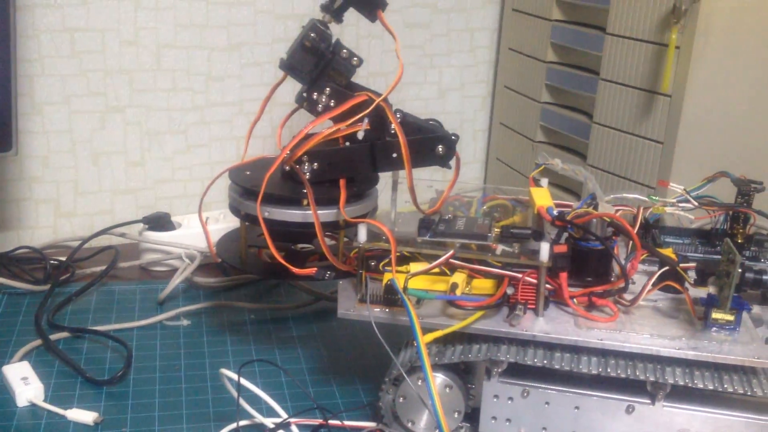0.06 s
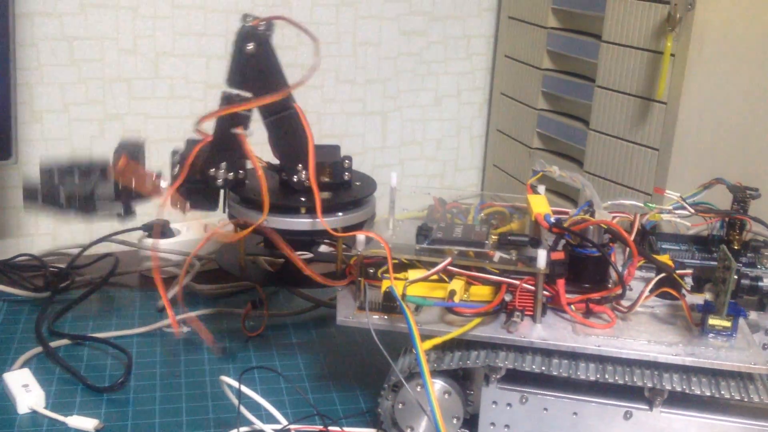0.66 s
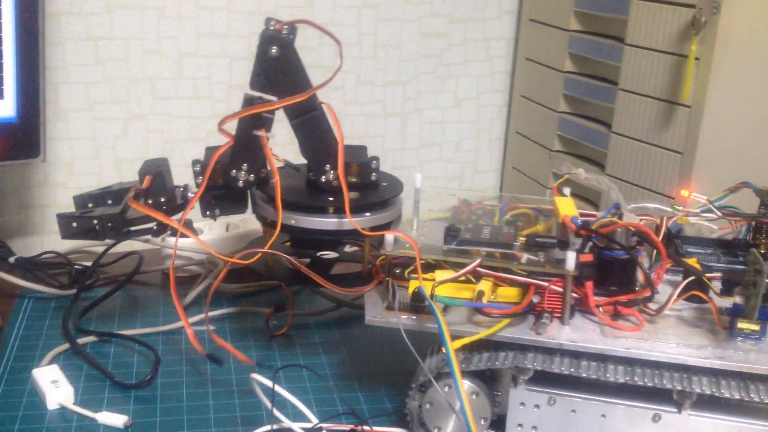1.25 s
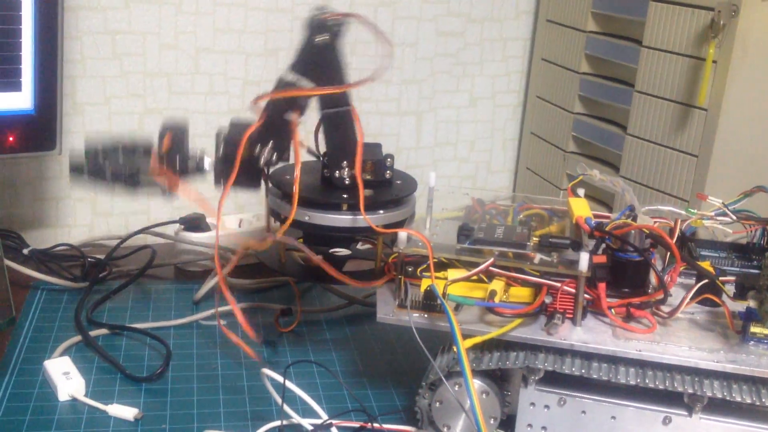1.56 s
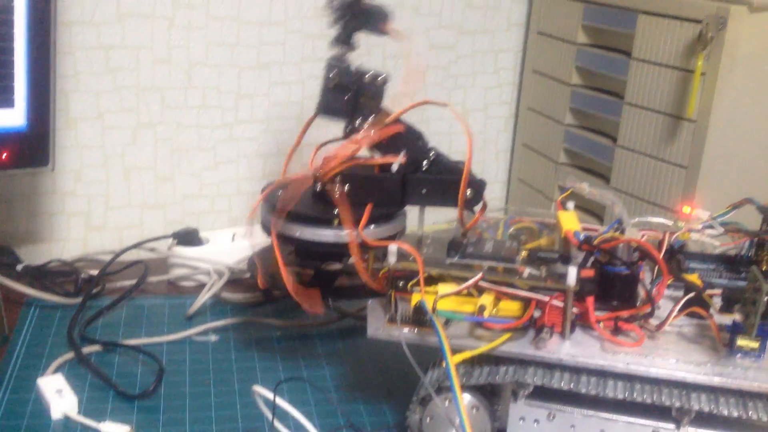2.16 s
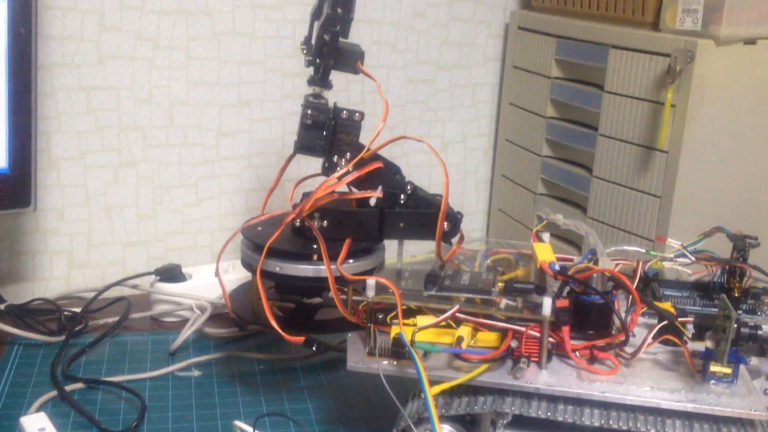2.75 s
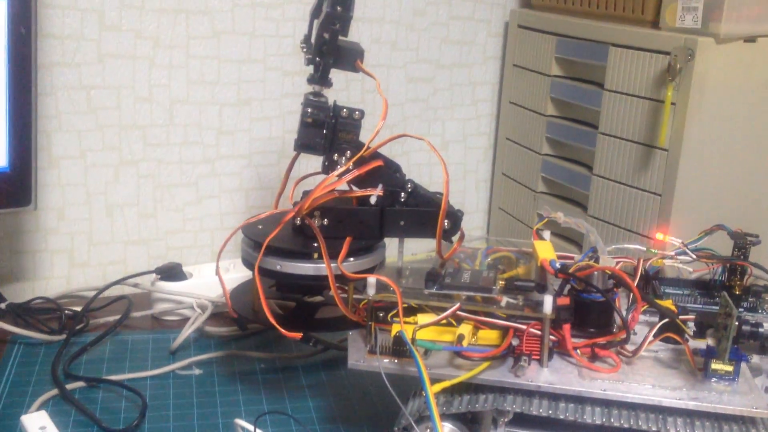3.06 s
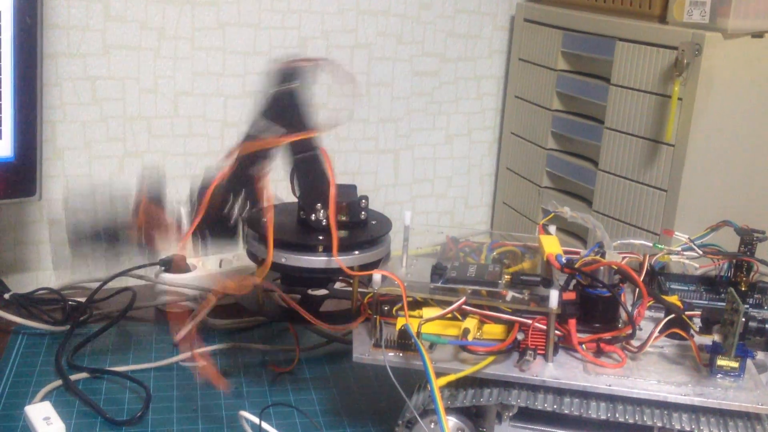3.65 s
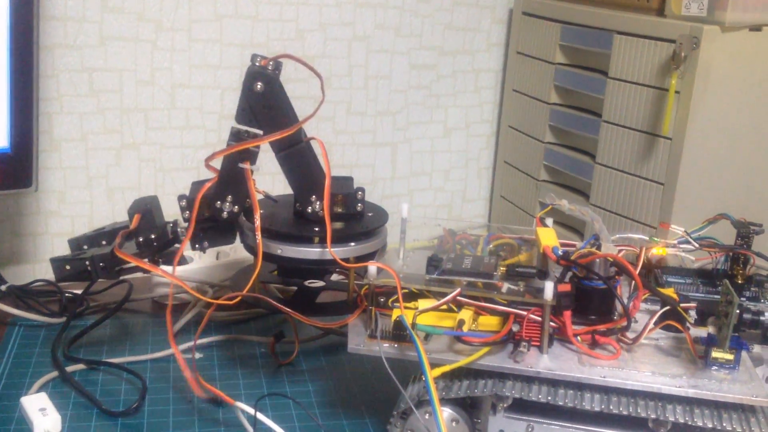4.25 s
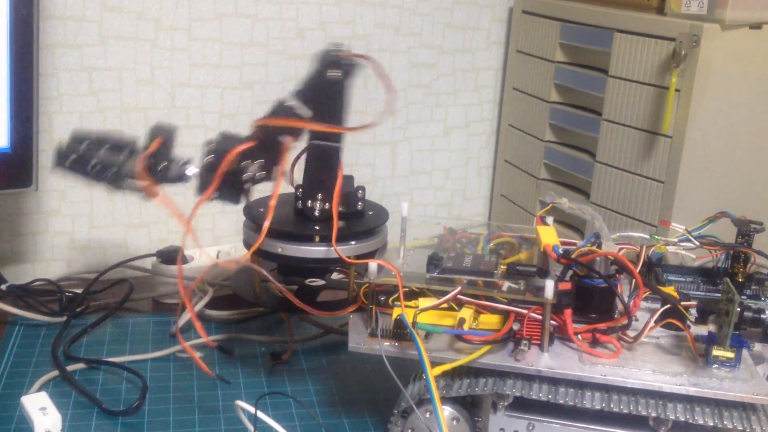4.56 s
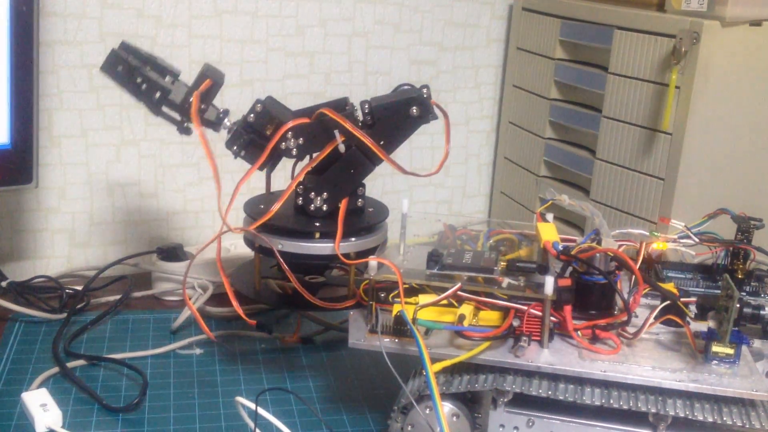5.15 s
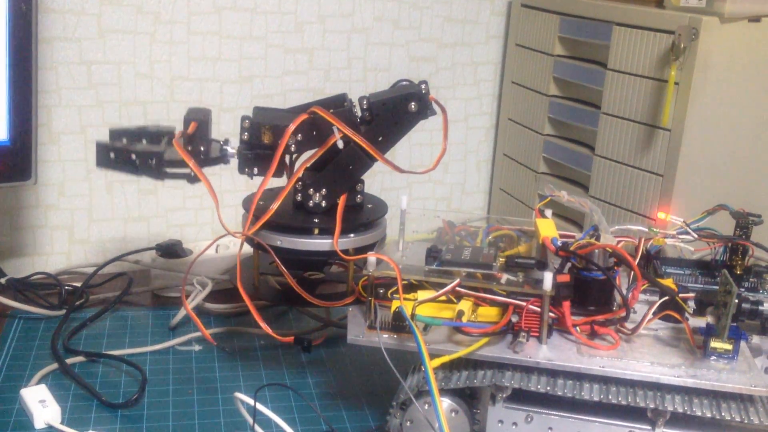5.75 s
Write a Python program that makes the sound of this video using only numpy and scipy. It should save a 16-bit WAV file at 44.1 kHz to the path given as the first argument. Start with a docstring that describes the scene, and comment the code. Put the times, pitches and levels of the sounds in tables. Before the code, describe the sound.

In a small, quiet room, a metal robot arm swings four times, each swing a short burst of whining, rattling servo gears with little gliding tones. The first and third swings end in sharp joint clacks and thumps on the workbench. Between moves there are faint ticks and a motor buzzing under load. Finally the arm creeps down with a thin, pulsing sizzle. The microphone sounds small and close, with little bass.

```python
"""In a small, quiet room, a metal robot arm on a workbench swings four times, then creeps slowly down.
Its geared servos whine at harmonics of the tooth-meshing rate, and colliding teeth excite the
resonances of the brackets as a rattle. Under load a motor sizzles, its brush noise pulsed by
commutation. When the arm lands, its joints clack and the impact rings the modes of the bench."""
import sys
import numpy as np
from scipy import signal
from scipy.fft import rfft, irfft
from scipy.io import wavfile
from scipy.ndimage import uniform_filter1d

SR = 44100
rng = np.random.default_rng(int(sys.argv[2]) if len(sys.argv) > 2 else 0)


def int16_out(signal):
    """Quantize to a 16-bit WAV file."""
    q = np.round(np.clip(np.atleast_2d(signal).T, -1, 1) * 32767)
    wavfile.write(sys.argv[1], SR, q.astype(np.int16))


N = 264600
TIME = np.arange(N) / SR
FREQS = np.maximum(np.arange(N // 2 + 1) * SR / N, 1)

# commutation rate of the loaded motor: (time [s], frequency [Hz])
COMMUTATION = [(.64, 460), (.9, 430), (1.12, 425), (1.25, 360), (4.92, 330), (5.15, 335), (5.22, 364),
               (5.41, 368), (5.46, 402), (5.6, 426), (5.68, 424), (5.765, 440), (6, 388)]
# landings and joints taking up slack: (time [s], clack [dB], thump [dB], thump tilt [dB/octave])
KNOCKS = [(0.5783, -27.5, -41, -0.5), (.643, -28.5, -34, 0), (0.696, -53, -53, -5), (0.869, -48, -52, -10),
          (.935, -51, -78, 11), (1.975, -48, -64.5, 13.5), (2.102, -52, -53, 7), (2.198, -60, -66.5, 8.5),
          (3.6208, -30.5, -38, 2), (3.677, -30.5, -35.5, 3), (3.7525, -23.5, -37.5, -3),
          (3.76, -26, -39, 6), (3.8266, -26.5, -28.5, -5.5), (3.8306, -27, -38.5, 4.5),
          (3.892, -39.5, -71, 12), (4.017, -71, -56, 8), (4.3137, -66, -73, 8.5), (5.974, -59.5, -57, 1.5)]
# spectrum of tooth impacts: (frequency [Hz], level [dB])
GEAR_SPECTRUM = [(80, -62), (300, -31), (520, -21), (600, -24.5), (680, -6), (900, -1), (1350, -3.5),
                 (1900, 2.5), (3000, 3), (5000, -4.5), (6500, -5.5), (8500, -10), (11000, -11),
                 (13500, -16), (15500, -23)]
# the four swings: (start [s], braking time [s], rocking of the base [dB])
SWINGS = [(0.133, 0.742, -73), (1.466, 2.118, -62), (3.204, 3.844, -66), (4.35, 4.822, -55)]
# effort of the gear train, one table a swing: (time [s], level [dB])
EFFORT = [
    [(.16, -36), (.21, -41), (.28, -36.5), (.395, -44.5), (.5, -33.5), (.61, -36), (.68, -42), (.76, -34.5)],
    [(1.55, -39), (1.65, -38.5), (1.72, -39.5), (1.83, -38), (1.86, -43), (1.96, -37.5), (2.04, -43.5),
     (2.09, -42), (2.12, -39)],
    [(3.31, -42), (3.38, -38.5), (3.44, -45), (3.53, -43), (3.6, -34.5), (3.65, -39.5), (3.78, -35.5),
     (3.84, -39.5)],
    [(4.37, -41.5), (4.43, -38), (4.47, -44), (4.5, -40), (4.62, -41), (4.69, -36), (4.77, -41),
     (4.82, -38.5)],
]
# shoulder gears, one table a swing: (time [s], mesh frequency [Hz], whine re effort [dB])
SHOULDER = [
    [(.15, 1620, -3), (.27, 1425, -5.5), (.404, 2128, -10), (.486, 2175, -2.5), (.518, 2369, -3.5),
     (.584, 2373, -16), (.61, 2061, -5.5), (.744, 2800, -16), (.8, 2370, -18)],
    [(1.5, 1548, -16), (1.64, 1559, -1), (1.7, 1584, -6.5), (1.764, 1656, -5.5), (1.825, 1473, -1),
     (1.885, 1792, 1), (1.97, 1825, -3.5), (2.05, 1512, -19), (2.114, 1896, -1)],
    [(3.26, 1617, -9), (3.315, 1547, -1), (3.36, 1500, -11), (3.53, 1601, -11), (3.562, 2176, -3),
     (3.602, 2367, -3), (3.636, 2348, -6.5), (3.716, 1754, -2.5), (3.82, 1979, -4)],
    [(4.39, 1524, -21), (4.434, 1687, -15), (4.496, 1494, -15), (4.6, 1578, -11.5), (4.68, 1643, -2.5),
     (4.728, 1392, -24), (4.8, 1527, -2.5), (4.85, 1478, -5)],
]


def from_db(db):
    """Amplitude ratio of a level in decibels."""
    return 10 ** (np.asarray(db) / 20)


def rms_one(x):
    """Normalisation to unit rms."""
    return x / np.sqrt(np.mean(x ** 2) + 1e-20)


def curve(tables, column):
    """Linear interpolation in time through one column of a list of tables."""
    rows = np.vstack(tables)
    return np.interp(TIME, rows[:, 0], rows[:, column])


def colour(points):
    """Spectral envelope: gain from levels interpolated over log frequency."""
    hz, db = np.transpose(points)
    return from_db(np.interp(np.log(FREQS), np.log(hz), db))


def resonances(peaks, floor_db):
    """Gain of Lorentzian resonances, added in power to a flat floor."""
    power = sum(from_db(db) ** 2 / (1 + (2 * (FREQS - hz) / width) ** 2) for hz, width, db in peaks)
    return np.sqrt(power + from_db(floor_db) ** 2)


def shaped(x, gain):
    """Filtering as multiplication of the spectrum; unit rms."""
    return rms_one(irfft(rfft(x) * gain, N))


def noise(gain):
    """Gaussian noise under a spectral envelope; unit rms."""
    return shaped(rng.standard_normal(N), gain)


def low_cut(x, hz, order):
    """Butterworth high-pass filtering."""
    return signal.sosfilt(signal.butter(order, hz, "high", fs=SR, output="sos"), x)


def drift(rate_hz):
    """Random fluctuation: low-pass noise of unit rms."""
    return noise(1 / (1 + (FREQS / rate_hz) ** 2))


def rotation(hz, jitter, rate_hz):
    """Phase in radians, the integral of a slightly unsteady frequency."""
    return 2 * np.pi * np.cumsum(hz * (1 + jitter * drift(rate_hz))) / SR


def impacts(per_s, spread_db):
    """Shot noise: impulses at random times, their levels spread by spread_db; unit rms."""
    sizes = from_db(spread_db * np.minimum(rng.exponential(1, N), 4))
    return rms_one(sizes * rng.choice([-1, 1], N) * (rng.random(N) < per_s / SR))


def impulses(times, db):
    """Ideal blows: one impulse at each time."""
    clicks = np.zeros(N)
    clicks[np.round(times * SR).astype(int)] = from_db(db)
    return clicks


def decay(clicks, t60):
    """Damping: an envelope that jumps at each impulse and falls exponentially."""
    return signal.lfilter([1], [1, -from_db(-60 / (t60 * SR))], clicks + 1e-18)


def arch(start, length):
    """Half-sine envelope."""
    return np.sin(np.pi * np.clip((TIME - start) / length, 0, 1)) * (TIME < start + length)


def swinging(jerk=0.064, run_up_s=0.083, brake_db_per_s=439):
    """Envelope of the swings: a jerk, a power-law run-up, full motion, then exponential braking."""
    gain = 0
    for start, braking, _ in SWINGS:
        run_up = np.clip((TIME - start) / run_up_s, 0, 1) ** 1.57
        brake = from_db(-brake_db_per_s * np.maximum(TIME - braking, 0))
        gain = gain + (TIME >= start) * (jerk + (1 - jerk) * run_up) * brake
    return gain


def pushing():
    """Envelopes of rattle and of sizzle as a servo applies brief torque to reach or hold its angle."""
    # servo pushes: (centre time [s], duration [s], gear rattle [dB], motor sizzle [dB])
    pushes = [(0.728, 0.21, -71, -33.5), (0.833, 0.11, -44.5, -75), (0.898, 0.1, -46.5, -48.5),
              (1.011, 0.17, -55, -57.5), (1.087, 0.16, -56.5, -48.5), (1.19, 0.11, -63, -70),
              (2.121, 0.049, -44, -38.5), (2.205, 0.073, -57, -76), (2.274, 0.15, -52.5, -77),
              (2.38, 0.05, -67.5, -74), (3.271, 0.033, -54, -64), (3.963, 0.14, -49.5, -78),
              (4.954, 0.052, -63.5, -66)]
    rattle = sizzle = 0
    for centre, length, rattle_db, sizzle_db in pushes:
        swell = arch(centre - length / 2, length) ** 1.7
        rattle = rattle + from_db(rattle_db) * swell
        sizzle = sizzle + from_db(sizzle_db) * swell
    return rattle, sizzle


def strain(start_s=4.99, stop_s=6.01, fade_s=0.12, db_per_octave=14.5, hunt_hz=6.92):
    """Envelope of the loaded motor: pushes, then a creep, louder with speed, surging as the servo hunts."""
    _, pushes = pushing()
    creeping = np.clip(np.minimum(TIME - start_s, stop_s - TIME) / fade_s, 0, 1)
    octaves = np.log2(curve([COMMUTATION], column=1) / 400)
    hunting_db = 2 * np.cos(2 * np.pi * hunt_hz * (TIME - 5.465))
    return pushes + creeping * from_db(-54.5 + db_per_octave * octaves + hunting_db)


def background():
    """The room's noise floor: faint, stationary broadband noise."""
    # ambient spectrum: (frequency [Hz], level [dB])
    spectrum = [(25, -17), (60, -21), (90, -25), (130, -17), (200, -5), (300, -10.5), (550, -14.5),
                (1200, -16.5), (2000, -20.5), (4200, -23.5), (10000, -31.5), (12500, -30), (15400, -24)]
    return from_db(-66.5) * noise(colour(spectrum))


def reverberation(x, t60, wet_db):
    """Diffuse reflections follow the direct sound and decay exponentially."""
    t = TIME[:SR // 2]
    tail = rng.standard_normal(len(t)) * from_db(-60 * t / t60) * (t > .003)
    return x + from_db(wet_db) * signal.fftconvolve(x, tail / np.linalg.norm(tail))[:N]


def base_tremble():
    """Structure-borne vibration: rocking mass, gears, knocks and motor shake the base, adding in power."""
    # spectrum of the vibrating base: (frequency [Hz], level [dB])
    spectrum = [(30, -45), (90, -32), (125, -3), (175, 0), (200, -3), (235, 4), (285, -6), (430, -10),
                (600, -17), (900, -50)]
    times, _, thump_db, _ = np.transpose(KNOCKS)
    rocking = sum(from_db(db) * arch(start + 0.068, length=0.21) for start, _, db in SWINGS)
    gears = from_db(curve(EFFORT, column=1) - 27) * swinging()
    aftershake = decay(impulses(times, thump_db - 9), t60=0.41)
    motor = from_db(-22) * strain()
    envelope = np.sqrt(rocking ** 2 + gears ** 2 + aftershake ** 2 + motor ** 2)
    return low_cut(envelope * noise(colour(spectrum)), hz=125, order=4)


def tooth_ticks(body):
    """Impulse excitation: a tooth catches as a servo starts or corrects, and the brackets ring."""
    # teeth catching: (time [s], level [dB])
    catches = [(0.131, -51), (0.159, -47), (1.473, -59), (2.378, -64), (3.21, -50), (3.2536, -50),
               (4.0432, -58), (4.351, -54), (4.9434, -71.5), (5.23, -63)]
    ringing = noise(body * colour(GEAR_SPECTRUM))
    return decay(impulses(*np.transpose(catches)), t60=0.094) * ringing


def knocks(body):
    """Impacts make the joints clack and ring the damped modes of the bench, which radiates little bass."""
    # spectrum of the metal joints: (frequency [Hz], level [dB])
    spectrum = [(180, -32), (300, 0), (599, -18), (876, 1), (1640, -4.5), (1900, -1), (3730, -9.5),
                (3990, -10), (4330, -9.5), (12000, -14), (15400, -19)]
    # modes of the base on the bench: (frequency [Hz], level [dB], decay time t60 [s])
    modes = [(131.7, -9.5, 0.23), (151.6, -1.5, 0.13), (177, -2.5, 0.39), (228.7, -6, 0.22),
             (242.3, 1, 0.27), (315, -12, 0.25), (423.5, -7, 0.11), (538, -19.5, 0.35), (658, -8, 0.082),
             (850, -2.5, 0.037), (1006, -11, 0.1)]
    times, clack_db, thump_db, tilt = np.transpose(KNOCKS)
    clack = decay(impulses(times, clack_db), t60=0.089) * noise(np.sqrt(body) * colour(spectrum))
    thump = np.zeros(N)
    for hz, db, t60 in modes:
        radius, omega = from_db(-60 / (t60 * SR)), 2 * np.pi * hz / SR
        arrival = times + rng.uniform(0, 0.0028, len(times))   # bending waves take unequal paths
        strength_db = thump_db + db + tilt * np.log2(hz / 200) + rng.normal(-1.5, 2, len(times))
        hits = impulses(arrival, strength_db) + 1e-18
        ringing = signal.lfilter([0, np.sin(omega)], [1, -2 * radius * np.cos(omega), radius ** 2], hits)
        thump += rng.choice([-1, 1]) * ringing
    return low_cut(clack + thump, hz=116, order=6)


def straining_motor():
    """Commutation drives the can's resonances with periodic clicks and brush noise, over thin harmonics."""
    # resonances of the motor can: (frequency [Hz], bandwidth [Hz], level [dB])
    can_modes = [(4230, 180, 7), (4700, 33, 6.5), (4800, 140, 12.5), (5440, 88, 8), (6180, 99, -30),
                 (6000, 62, 9.5), (6100, 39, -2.5), (6446, 70, 9.5), (6800, 29, 12.5), (7460, 63, 10),
                 (8170, 140, 6.5)]
    # spectrum of the brush sizzle: (frequency [Hz], level [dB])
    spectrum = [(710, -10), (1200, -39), (1550, -11), (1600, -20), (1760, -10), (2280, -15), (2850, -7.5),
                (3530, -14.5), (4760, -11), (5520, -10), (6700, -2), (10000, -13), (12700, -6.5),
                (14400, -13), (15400, -37)]
    # harmonics of the commutation rate: (order [1], level [dB])
    harmonics = [(2, -7), (3, -14), (4, -12), (5, 1), (6, 0), (7, 1), (8, -4), (9, 2), (10, 2), (11, 1),
                 (12, 2), (14, 2)]
    phase = rotation(curve([COMMUTATION], column=1), jitter=.008, rate_hz=45)
    puffs = rms_one(np.exp(0.2 * (np.cos(phase) - 1)))
    spikes = rms_one(np.exp(300 * (np.cos(phase) - 1)))
    brushes = puffs * impacts(per_s=19000, spread_db=0) + 0.45 * rms_one(np.gradient(spikes))
    can = resonances(can_modes, floor_db=-1) / (1 + (700 / FREQS) ** 4)   # too small to radiate bass
    sizzle = shaped(brushes, colour(spectrum) * can)
    tones = sum(from_db(db + 3 * drift(12) + 3 * drift(70)) * np.sin(k * phase) for k, db in harmonics)
    return strain() * (sizzle + from_db(-15.5) * tones)


def mesh_tone(hz, levels_db):
    """Modulation of tooth-rate harmonics: uneven teeth broaden each, an eccentric pinion adds sidebands."""
    phase = rotation(hz, jitter=.012, rate_hz=80)
    tone = 0
    for order, db in enumerate(levels_db, 1):
        clean = np.sin(order * phase)
        smear = drift(120) * clean + drift(120) * np.cos(order * phase)
        tone = tone + from_db(db) * rms_one(clean + .75 * smear)
    return tone * (1 + .4 * np.cos(phase / 10))   # ten teeth to a turn


def elbow_whine():
    """Mesh frequency follows speed, so the elbow's brief moves sound as gliding tones."""
    # elbow glides: (start [s], duration [s], first frequency [Hz], last frequency [Hz], peak level [dB])
    glides = [(.24, 0.12, 2545, 3420, -49), (.575, 0.084, 4230, 3900, -39), (3.28, 0.077, 2143, 2481, -44),
              (3.34, 0.077, 2656, 3360, -39.5), (3.674, 0.071, 3810, 3387, -40.5),
              (4.405, 0.069, 3250, 3380, -42), (4.47, 0.0661, 3759, 3700, -41),
              (4.55, .08, 3485, 3920, -43.5), (4.68, 0.079, 3674, 4090, -41), (4.707, .08, 2524, 2880, -42)]
    whine = 0
    for moves in (glides[0::2], glides[1::2]):   # successive glides may overlap
        pitch = [[(start, first), (start + length, last)] for start, length, first, last, _ in moves]
        envelope = sum(from_db(db) * arch(start, length) for start, length, _, _, db in moves)
        whine = whine + envelope * mesh_tone(curve(pitch, column=1), levels_db=[0, -8])
    return whine


def shoulder_whine():
    """The mesh tone grows with effort; case resonances lift whichever harmonic glides through them."""
    # mesh harmonics, from the fundamental up: (level [dB])
    harmonics_db = [-6, -4, -6.5, -7.5, -8]
    # resonances of the gear case: (frequency [Hz], bandwidth [Hz], level [dB])
    case_modes = [(1800, 140, 5), (2260, 170, 5.5), (3080, 160, 5.5), (4620, 240, 2)]
    envelope = swinging() * from_db(curve(EFFORT, column=1) + curve(SHOULDER, column=2))
    flickering_db = [db + 2 * drift(14) for db in harmonics_db]
    tone = mesh_tone(curve(SHOULDER, column=1), flickering_db)
    return irfft(rfft(envelope * tone) * resonances(case_modes, floor_db=-4), N)


def worn_pinion(teeth=10, size=256):
    """Periodicity: the same flaws recur on every turn, giving a comb of tones that glides with speed."""
    angle = rotation(curve(SHOULDER, column=1) / teeth, jitter=.006, rate_hz=40.6)
    flaws = rng.standard_normal(size)
    return rms_one(np.interp(angle / (2 * np.pi) * size, np.arange(size), flaws, period=size))


def shifting_contacts(x, depth_db, size=512):
    """Spectral modulation: gear contacts move as the arm turns, so narrow bands swell and fade."""
    cells = signal.stft(x, nperseg=size)[2]
    swell = rng.standard_normal(cells.shape)
    for axis, width in ((0, 3), (0, 3), (1, 8), (1, 6)):   # smooth over frequency, then time
        swell = uniform_filter1d(swell, width, axis=axis)
    return signal.istft(cells * from_db(depth_db * rms_one(swell)), nperseg=size)[1][:N]


def gear_rattle(body, usual_effort_db=-38.5):
    """Backlash: loose teeth collide thousands of times a second, in bunches, and ring the brackets."""
    effort_db, moving = curve(EFFORT, column=1), swinging()
    pushes, _ = pushing()
    teeth = impacts(per_s=8000, spread_db=2.3) + .75 * moving * worn_pinion()
    teeth = shifting_contacts(teeth, depth_db=2.1)
    teeth = teeth * from_db(1.42 * drift(31))
    case = body * colour(GEAR_SPECTRUM)
    above_growl, above_middle = (1 / (1 + (hz / FREQS) ** 12) for hz in (1400, 5200))
    growl = from_db(-10) * shaped(teeth, case * (1 - above_growl))
    middle = from_db(-3) * shaped(teeth, case * (above_growl - above_middle))
    treble = from_db(-4.5) * shaped(teeth, case * above_middle)
    # the growl follows effort only weakly, swells sooner, lasts longer and is weaker in pushes
    growl_db = usual_effort_db + 0.23 * (effort_db - usual_effort_db)
    growl_gain = moving ** 0.47 * from_db(growl_db) + from_db(-3.5) * pushes
    upper_gain = moving * from_db(effort_db) + pushes
    return growl_gain * growl + upper_gain * (middle + treble)


def scene():
    """Superposition: the arm's sources reverberate together over the noise floor."""
    # resonances of gear cases and brackets: (frequency [Hz], bandwidth [Hz], level [dB])
    bracket_modes = [(664, 39, 9.5), (820, 27, 0), (1168, 18, -2.1), (1517, 41, 6), (1713, 126, 5),
                     (1873, 120, 2.4), (2080, 27, -39), (2348, 35, -3), (2860, 54, 2.5), (3150, 72, 3),
                     (3840, 150, 3.5), (4244, 85, 6), (4330, 56, 7), (4750, 106, 3.5), (5500, 52, -12),
                     (5660, 62, 7), (6120, 310, -0.5), (6480, 62, -4.5), (6870, 38, 2), (7460, 76, -7.5),
                     (7480, 120, 2), (8400, 69, -13.3), (8400, 51, 6), (9156, 57, -26)]
    body = resonances(bracket_modes, floor_db=-0.5)
    servos = gear_rattle(body) + shoulder_whine() + elbow_whine() + straining_motor()
    arm = servos + knocks(body) + tooth_ticks(body) + base_tremble()
    return (background() + reverberation(arm, t60=0.21, wet_db=-7))[None]


def record(dry, cutoff_hz=15400):
    """Band limiting: the small microphone loses the deepest bass, and the top is cut steeply."""
    thin = low_cut(dry, hz=60, order=1)
    return signal.sosfilt(signal.ellip(12, .1, 80, cutoff_hz, fs=SR, output="sos"), thin)


dry = scene()
out = record(dry)
int16_out(out)
```